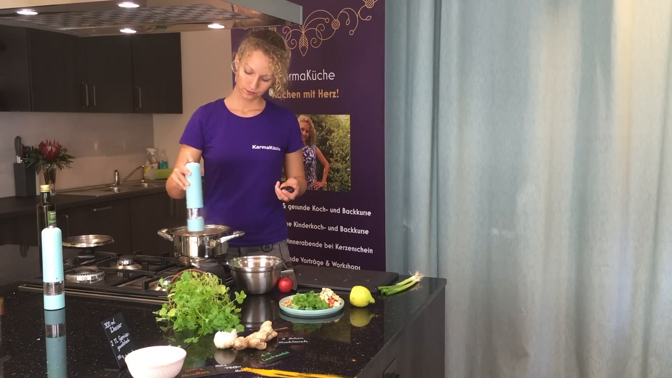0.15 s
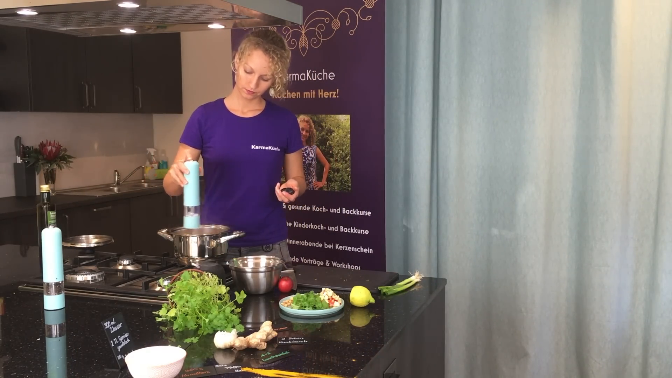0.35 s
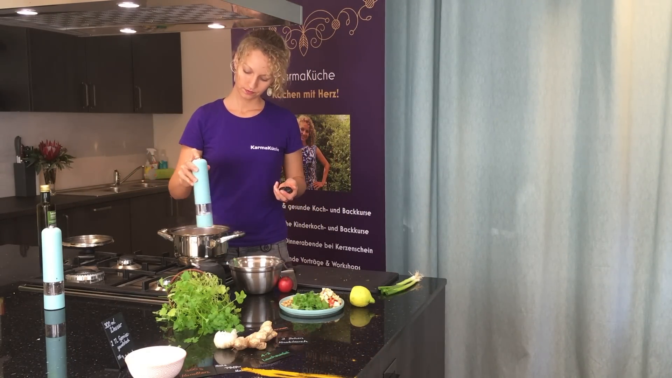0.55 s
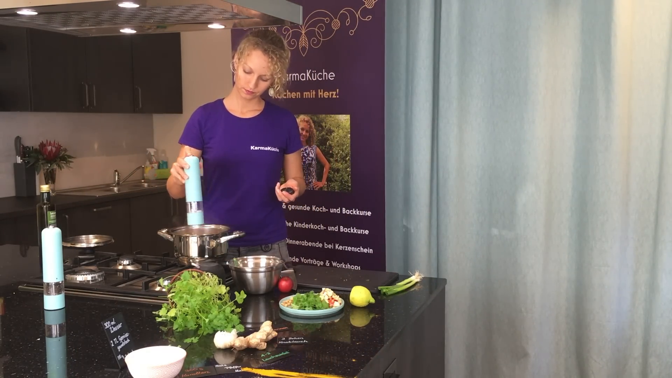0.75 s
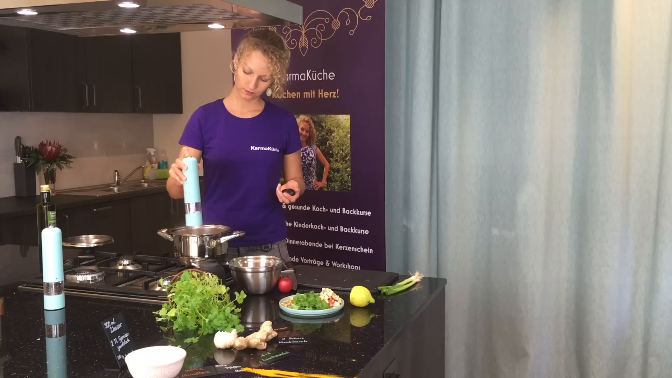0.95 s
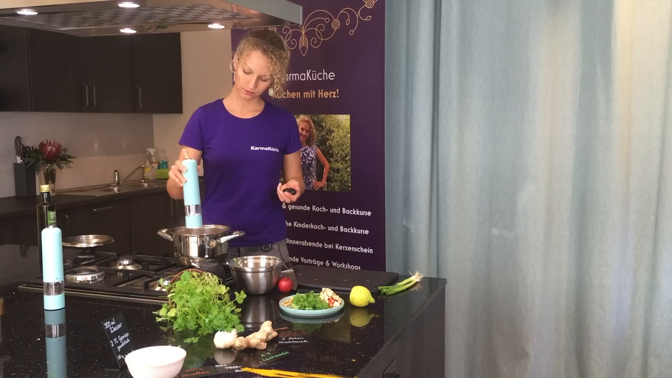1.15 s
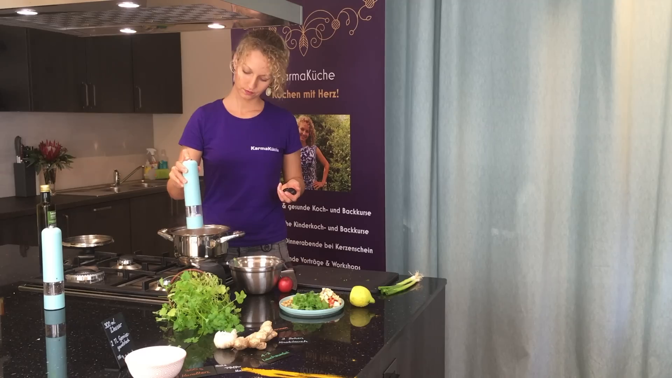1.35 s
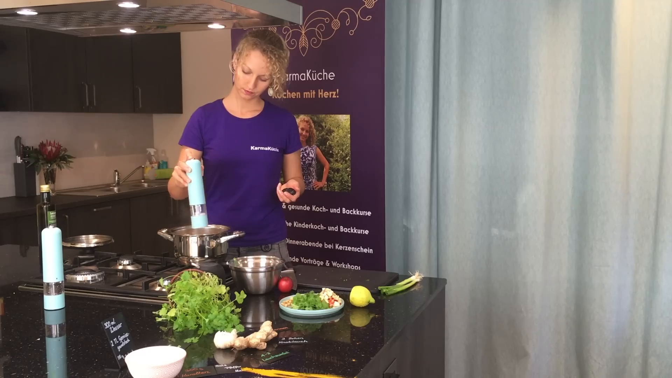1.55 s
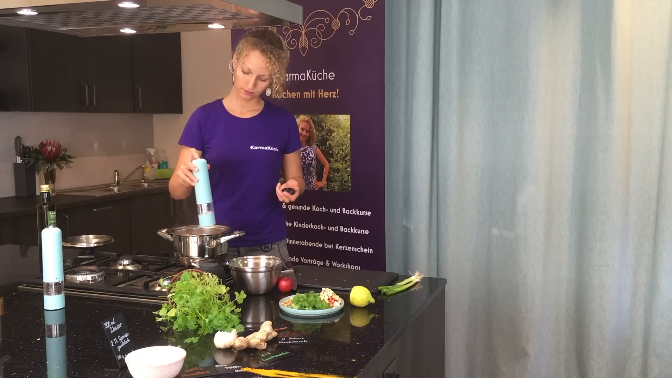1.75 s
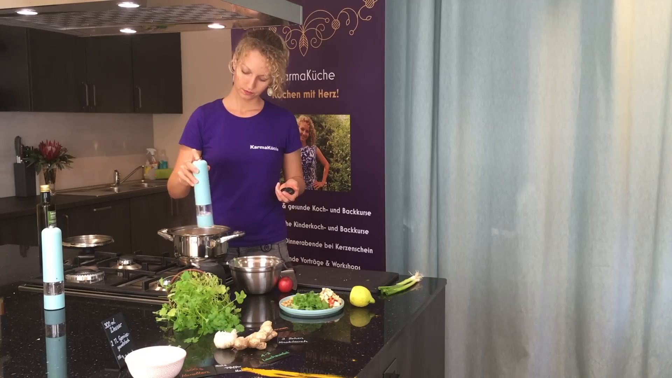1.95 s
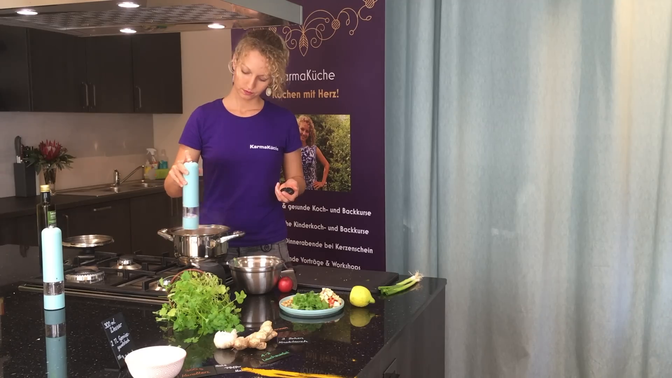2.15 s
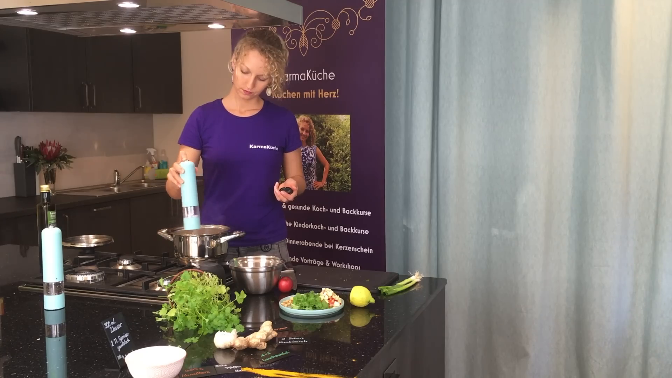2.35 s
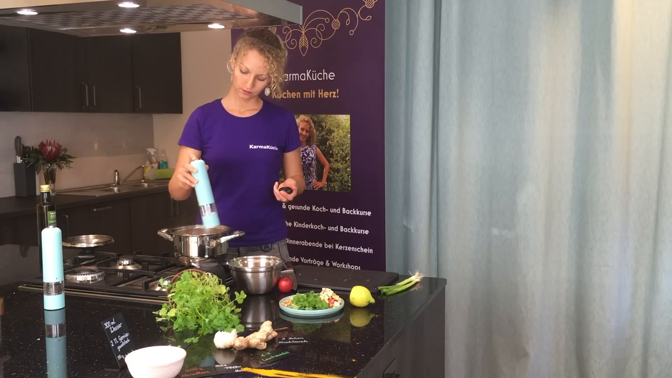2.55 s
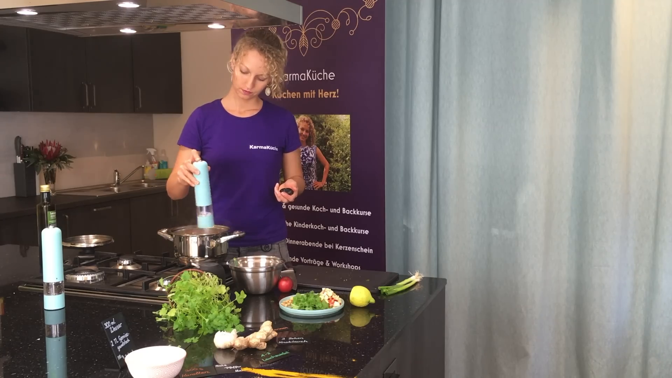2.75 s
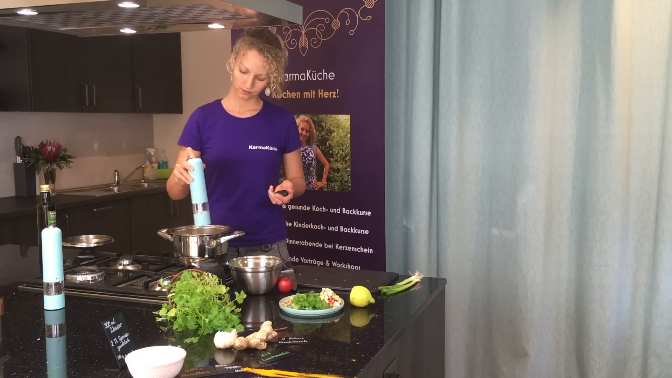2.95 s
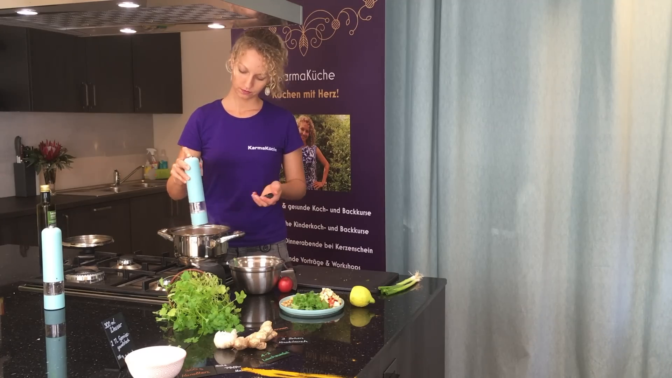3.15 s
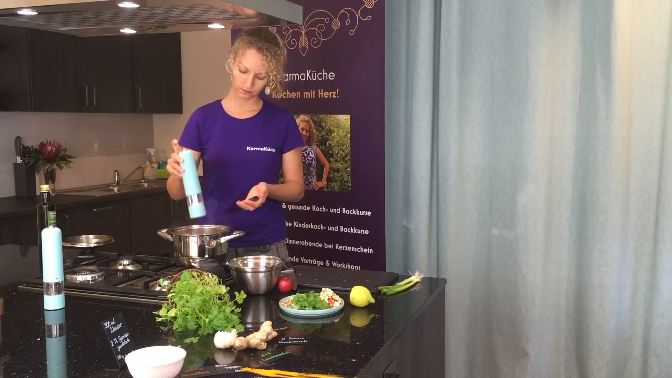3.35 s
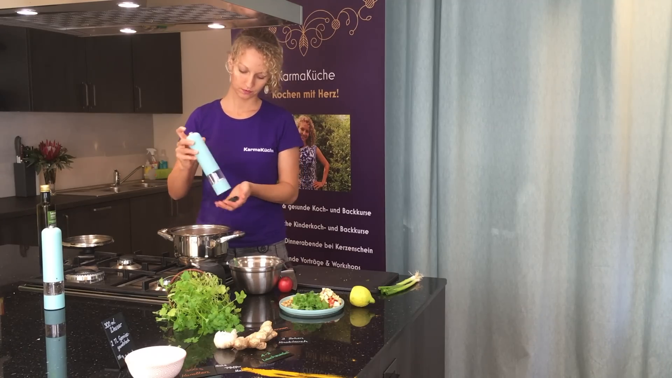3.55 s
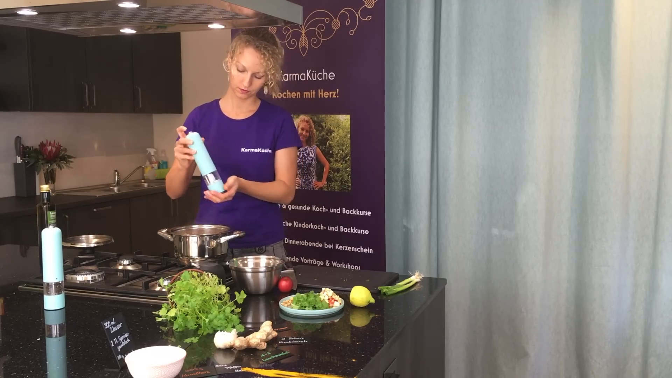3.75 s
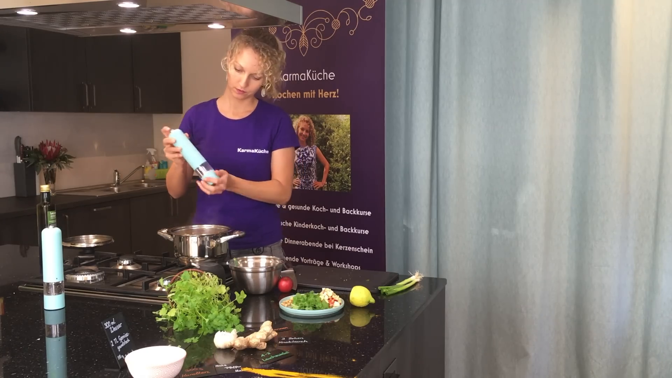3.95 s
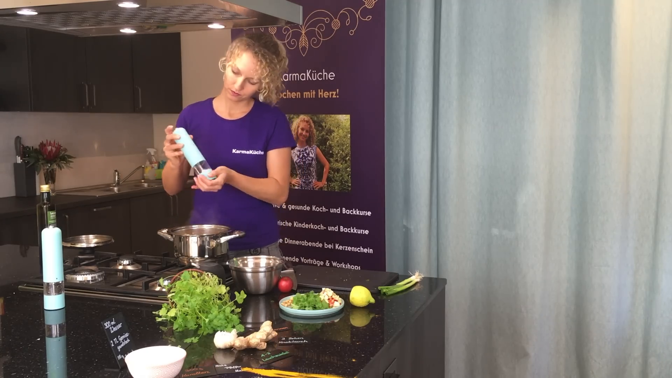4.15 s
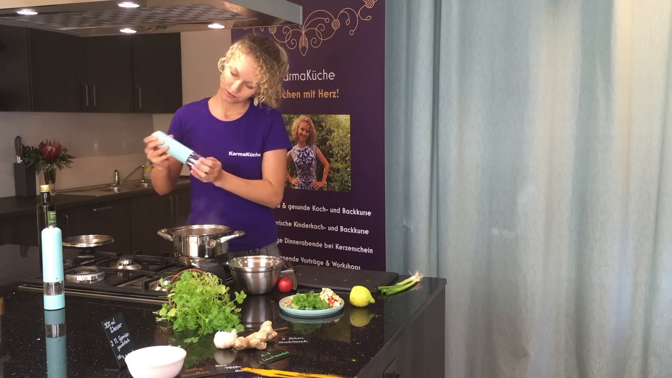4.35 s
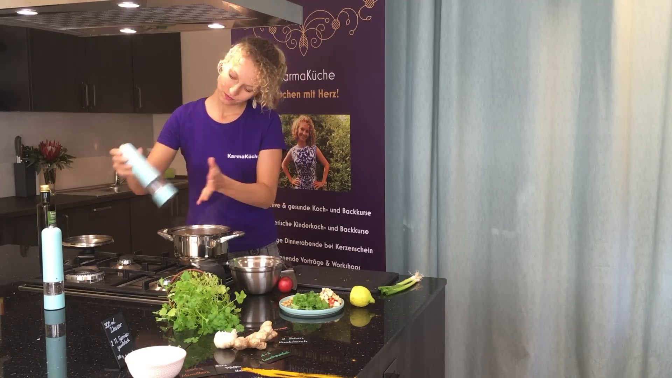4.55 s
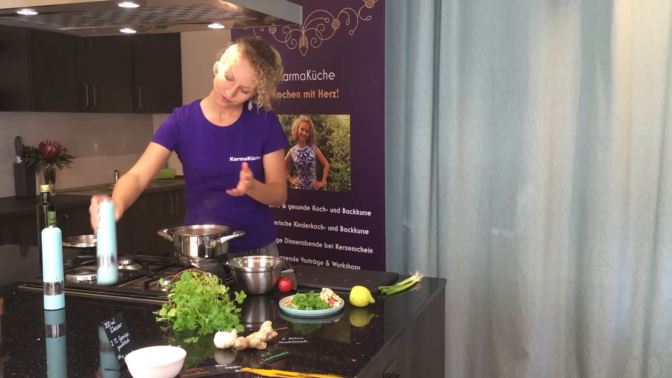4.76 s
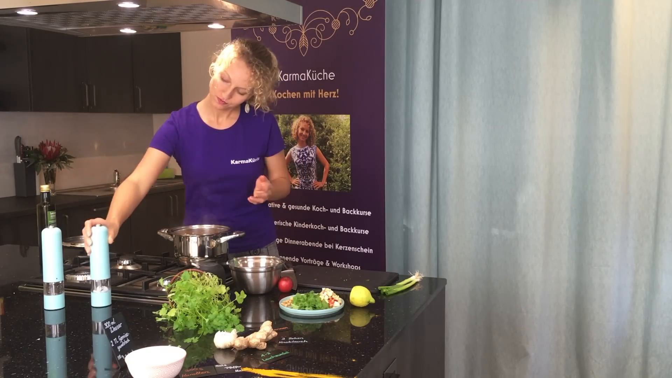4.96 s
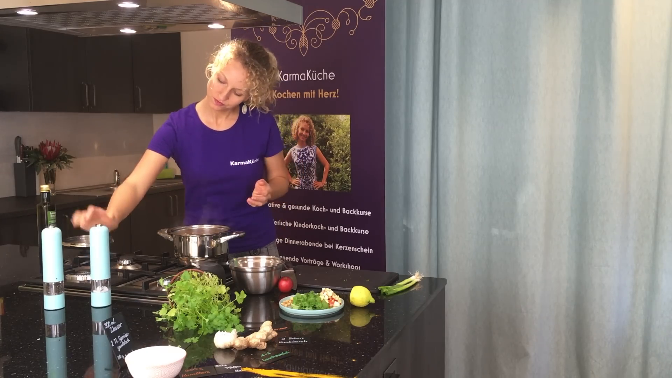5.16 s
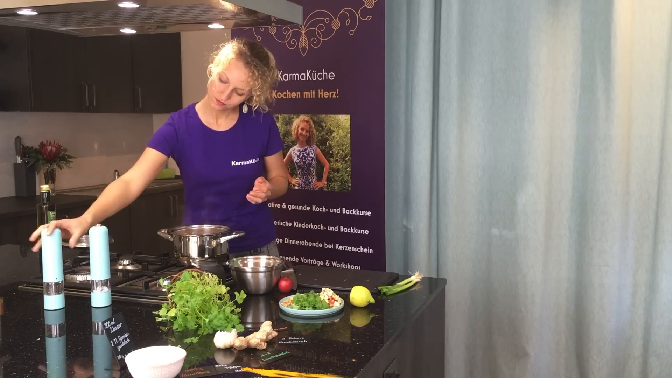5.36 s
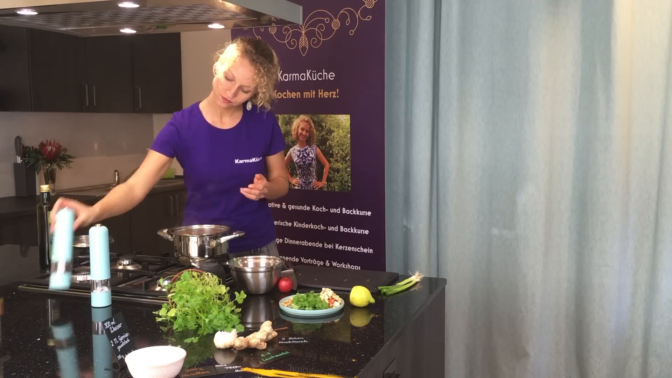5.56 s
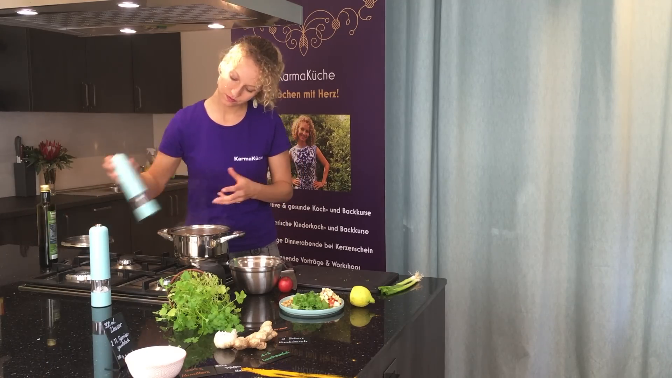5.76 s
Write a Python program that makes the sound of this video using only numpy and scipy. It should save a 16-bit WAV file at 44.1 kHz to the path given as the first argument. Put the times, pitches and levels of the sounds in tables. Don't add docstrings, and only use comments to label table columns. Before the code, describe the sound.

From the first instant a battery-powered seasoning mill runs over a pot: a nasal, buzzing motor and gear whine with rough, bright grinding noise. The pitch sags briefly as corns jam, and creeps slightly higher after about 2.4 s. Dry cracks pop out at roughly 0.2, 0.6, 1.0, 1.6, 2.5 and 2.8 s. At 3.2 s the motor lets go and winds down within a fraction of a second, with a small last crackle at 3.4 s. A sharp plastic cap snap comes at 3.7 s, a short scraping slide near 3.9 s, and a hollow seating clack at 4.1 s. Light ticks follow at 4.3 and 4.5 s. At 4.95 s the mill lands on stone with a low, solid thump; small double knocks come around 5.4 to 5.5 s. The hard-walled kitchen rings around everything, heard by a distant mono microphone over faint hiss and extractor hum.

```python
import sys
import numpy as np
from scipy import signal
from scipy.fft import rfft, irfft, next_fast_len
from scipy.io import wavfile

SR = 44100
rng = np.random.default_rng(int(sys.argv[2]) if len(sys.argv) > 2 else 0)


def waveform_to_disk(signal):
    frames = np.transpose(np.atleast_2d(signal))
    scaled = np.clip(frames, -1, 1) * 32767
    samples = np.round(scaled).astype(np.int16)
    wavfile.write(sys.argv[1], SR, samples)


def makeup_ratio(level_db):
    decades = np.asarray(level_db, float) / 20
    return 10 ** decades


N = 256220

# multiple of shaft speed, level in dB.
WHINE_ORDERS = [(1, -28), (3, -12.5), (4, -11.5), (5, -26), (6, -24), (7, -2.5), (8, -3), (9, -9),
                (10, -2.5), (11, 3), (12, -4.5), (14, -5), (15, -12), (16, -13), (18, -18), (21, -5),
                (22, -13.5), (33, -8.5)]
# time in seconds, shaft speed in turns per second.
FREE_SPEED = [(0, 194), (.12, 199), (.45, 194), (.66, 193), (.76, 200), (1.35, 196), (1.62, 196),
              (1.85, 199), (2.13, 203), (2.33, 204), (2.47, 213), (3.1, 212), (3.23, 208)]
# middle in seconds, length in seconds, speed sag in Hz.
JAMS = [(.36, .07, 7), (.99, .16, 14), (1.105, .08, 31), (1.2, .14, 14), (1.445, .11, 16), (1.725, .07, 35),
        (2.005, .19, 14), (2.68, .29, 10), (2.925, .16, 24)]
# middle in seconds, length in seconds, whine boost in dB.
BITES = [(.27, .25, 5), (.55, .25, 4), (.86, .22, 7), (1.1, .08, 2), (1.36, .14, 5), (1.57, .14, 3),
         (2.01, .17, 9), (2.3, .24, 8), (2.5, .08, 4), (2.93, .14, 5), (3.13, .15, 2)]
# frequency in Hz, level in dB per Hz.
GRIT_SPECTRUM = [(88, -51), (150, -56), (193, -28), (367, -31.5), (608, -12.5), (950, -10.5), (1370, -4),
                 (1910, -5), (2110, -5), (3850, -9), (6630, -11.5), (7750, -17), (9790, -12.5),
                 (15600, -15)]
# frequency in Hz, width in Hz, level in dB.
SHELL_MODES = [(1400, 180, -6), (1575, 71, 3), (2200, 160, 5.5), (2940, 690, 7.5), (4630, 500, 7),
               (6370, 1600, -1.5), (9300, 530, -5)]

# start in seconds, peak in dB,
# treble in dB per octave.
CRACKS = [(0.181, -22.5, -0.5), (.632, -17.5, -1), (1, -22, 1), (1.23, -47, -2), (1.63, -22, 5),
          (1.645, -21, -0.5), (1.658, -33, -2), (2.15, -33, 13), (2.5035, -18, 5), (2.5805, -16, 8.5),
          (2.811, -18.5, 1), (2.838, -23, 12), (2.98, -40, -5), (3.145, -45, 0), (3.25, -23.5, -4.5),
          (3.405, -30.5, 18.5)]
# start in seconds, peak in dB, treble in dB per octave.
SNAPS = [
    (3.6948, -25.5, -2),
    (3.7047, -9.5, 1.5),
]
# start in seconds, peak in dB, treble in dB per octave.
PUSHES = [
    (3.947, -46, 0.71),
    (4.0815, -16.5, 0),
]
# start in seconds, peak in dB, treble in dB per octave.
TICKS = [
    (4.2697, -37, 1.6),
    (4.5165, -31, -1.8),
]
# start in seconds, peak in dB, treble in dB per octave.
THUMPS = [
    (4.9515, -16, -0.5),
    (5.355, -54.5, -13),
    (5.41, -55, -6),
    (5.47, -52.5, -26),
    (5.54, -56.5, -5),
]
# start in seconds, peak in dB, treble in dB per octave.
LIFTS = [
    (5.3878, -30.5, 0.93),
    (5.3985, -45, 1),
    (5.456, -35, 3.6),
    (5.467, -41.5, 0.84),
]
# seated at, in seconds, rise in seconds, level in dB.
SLIDES = [
    (3.946, 0.032, -38),
    (4.08, 0.0049, -41),
]

# frequency in Hz, width in Hz, level in dB.
CORN_MODES = [(506, 300, -29.5), (1330, 1100, 8.5), (3010, 500, 16.5), (5760, 2700, 1), (11900, 2700, -24)]
# frequency in Hz, width in Hz, level in dB.
CAP_MODES = [(336, 170, -16), (950, 540, -14), (1760, 610, -2), (2600, 720, -3.5), (3130, 370, 5),
             (4200, 790, -1.5), (6100, 340, 1.5), (8450, 460, -7), (10100, 310, -2.5), (13650, 900, -7),
             (6900, 60000, -12)]
# frequency in Hz, width in Hz, level in dB.
TUBE_MODES = [(285, 440, -23), (540, 120, -17), (1033, 95, 1.5), (1212, 280, 0.5), (1840, 830, -8),
              (3270, 880, -7.5), (4350, 570, -9.5), (5970, 1000, -15.5), (8000, 330, -49),
              (11000, 8800, -26)]
# frequency in Hz, width in Hz, level in dB.
RIM_MODES = [(4340, 720, 3), (9500, 1600, -6), (10900, 830, -6), (11800, 31000, -9)]
# frequency in Hz, width in Hz, level in dB.
COUNTER_MODES = [(70.4, 8.5, 8.5), (86.4, 5.9, -7), (127, 52, -6.5), (172, 33, -0.5), (225, 28, -6),
                 (264, 53, 4.5), (312, 60, -5.5), (423, 53, -3.5), (714, 100, -11.5), (870, 240, -15.5),
                 (1210, 294, -3), (3100, 1900, -18), (6030, 1040, -21), (11200, 5700, -29.5)]
# frequency in Hz, width in Hz, level in dB.
BASE_MODES = [(288, 750, 4.5), (1330, 260, 9.5), (2700, 2400, -1), (6400, 1800, -1), (11800, 8800, -3.5)]

# frequency in Hz, T60 in seconds.
ROOM_T60_S = [(80, 0.71), (210, 0.75), (560, 0.49), (1470, 0.78), (3880, 0.77), (10200, 0.5), (16000, 0.25)]
# frequency in Hz, level in dB.
ROOM_LEVEL_DB = [(80, 13.5), (250, 12.5), (600, 13.5), (1500, 5.5), (4000, 1), (10000, 3.5), (16000, -2)]
# delay in seconds, level in dB.
EARLY_ECHOES = [(.0034, -2.5), (.009, -25), (.0135, -13.5), (.021, -5.5), (.029, -9.5)]
# frequency in Hz, level in dB per Hz.
AIR_SPECTRUM = [(76, -33), (130, -7.5), (242, -9), (308, -10.5), (488, -11.5), (659, -15), (2280, -24),
                (7740, -27.5), (8900, -26.5), (10200, -25), (12300, -24), (15600, -24)]
# frequency in Hz, level in dB rms.
HUM_TONES = [(48.4, -66), (96.9, -62.5), (199.2, -79.5), (306.8, -72.5)]
# frequency in Hz, width in Hz, level in dB.
MIC_COLOUR = [(4580, 83, -4), (7580, 300, 1), (8550, 110, 2.5), (10530, 190, -4.5)]
# time in seconds, side against treble in dB.
PARTINGS = [(.815, -26), (1.895, -34), (2.01, -36), (2.105, -31), (2.18, -37), (2.347, -6), (2.555, -35),
            (4.66, -12), (4.73, -9), (4.9, -17), (5.34, -17)]

STOP_S, COAST_S, BRAKE_HZ_PER_S = 3.213, 0.073, 600
TEETH, OTHER_ORDERS_SHARE = 11, 0.34
WHINE_DB, WHINE_ROOM_SHARE = -41.5, 0.4
FLUTTER_DB, FLUTTER_PER_S = 2.0, 35
GRIND_DB, BRIGHT_DB, BRIGHTEN_DB_PER_S = -36.5, -3.5, 0.55
CRUSH_DB, CRUSH_S, LOUD_CRACK_DB = 6.5, 0.043, -11.5
JAM_DB_PER_HZ = -0.0289
SLIDE_RISE_DB, SLIDE_FADE_DB_PER_S = 12, 354
AIR_DB, RUMBLE_DB = -61, -67
EDGE_HZ = 15860


def mill():
    t_s = np.arange(N) / SR
    sag_hz = plateaus(JAMS)
    after_s = np.maximum(t_s - STOP_S, 0)
    free_hz = np.interp(t_s, *np.transpose(FREE_SPEED))
    shaft_hz = np.maximum(free_hz - sag_hz - BRAKE_HZ_PER_S * after_s, 20)
    turns = np.cumsum(shaft_hz * (1 + 0.004 * wander(30))) / SR
    effort_db = GRIND_DB + CRUSH_DB * crush_load() + JAM_DB_PER_HZ * sag_hz
    coast = np.exp(-after_s / COAST_S)
    return coast * grit(turns, effort_db), coast * makeup_ratio(WHINE_DB) * evened(whine(turns))


def crush_load():
    load = np.zeros(N)
    for start_s, peak_db, _ in CRACKS:
        load[round(start_s * SR)] = makeup_ratio(peak_db - LOUD_CRACK_DB)
    return signal.lfilter([1], [1, -np.exp(-1 / (CRUSH_S * SR))], load)


def whine(turns):
    bite_db = plateaus(BITES)
    out = np.zeros(N)
    for order, db in WHINE_ORDERS:
        share = OTHER_ORDERS_SHARE if order % TEETH else 1
        level_db = db + FLUTTER_DB * wander(FLUTTER_PER_S) + bite_db * share
        out += makeup_ratio(level_db) * np.cos(2 * np.pi * (order * turns + rng.random()))
    return out


def grit(turns, effort_db):
    gate = 0.55 + 0.5 * np.exp(-(3 * turns % 1) / 0.18) + 0.33 * np.exp(-(turns % 1) / 0.25)
    puffs = evened(gate * rng.standard_normal(N))
    crumb_size = makeup_ratio(4.0 * np.minimum(rng.exponential(1, N), 3))
    crumbs = crumb_size * (rng.random(N) < 1500 / SR) * rng.choice([-1, 1], N)
    raw = puffs + 0.6 * evened(crumbs * makeup_ratio(2.5 * wander(25)))
    raw = coloured(raw, lambda hz: makeup_ratio(read(GRIT_SPECTRUM, hz)))
    high = coloured(raw, lambda hz: 1 / (1 + (4500 / (hz + 1)) ** 4))
    ringing = np.zeros(N)
    for mode_hz, width_hz, db in SHELL_MODES:
        ringing += makeup_ratio(db + 1.5 * wander(5)) * resonate(raw, mode_hz, width_hz)
    bright_db = BRIGHT_DB + BRIGHTEN_DB_PER_S * np.arange(N) / SR
    body = evened(raw - high + 1.25 * ringing) + makeup_ratio(bright_db) * evened(high)
    return makeup_ratio(effort_db - 6 + 1.0 * wander(45)) * body


def hits(rows, modes, chatter_s):
    out = np.zeros(N + 9000)
    t_s = np.arange(800) / SR
    for start_s, peak_db, treble_db in rows:
        force = np.fft.fft(rng.standard_normal(800) * np.exp(-t_s / chatter_s), 4096)
        force = np.fft.ifft(force / causal(np.log(abs(force) + 1e-9))).real[:800]
        ring = signal.fftconvolve(force, response(modes, treble_db))
        out[round(start_s * SR):][:len(ring)] += makeup_ratio(peak_db) * ring / abs(ring).max()
    return out[:N]


def rub():
    t_s = np.arange(N) / SR
    effort = np.zeros(N)
    for seated_s, rise_s, db in SLIDES:
        rise_db = SLIDE_RISE_DB * (seated_s - t_s) / rise_s
        fade_db = SLIDE_FADE_DB_PER_S * (t_s - seated_s)
        effort += (t_s > seated_s - rise_s) * makeup_ratio(db - np.where(t_s < seated_s, rise_db, fade_db))
    slips = evened(rng.standard_normal(N) * (rng.random(N) < 4000 / SR))
    tube, rim = response(TUBE_MODES), response(RIM_MODES)
    both = tube / np.linalg.norm(tube) + makeup_ratio(-14) * rim / np.linalg.norm(rim)
    return signal.oaconvolve(effort * slips, both)[:N]


def kitchen(x):
    longer = np.r_[x[SR:0:-1], x]
    turn = np.pi * np.arange(len(longer)) / SR / 0.5
    out = x.copy()
    for k in range(3):
        share = np.sqrt(2 / 3) * abs(np.cos(turn + k * np.pi / 3))
        out += signal.fftconvolve(share * longer, room_tail())[SR:SR + N]
    return out


def room_tail():
    taps = np.zeros(SR)
    at = np.arange(100, SR - 12, 12)
    taps[at + rng.integers(0, 12, len(at))] = rng.choice([-1., 1.], len(at))
    hz, t_s, z = signal.stft(taps, SR, nperseg=512)
    t60_s = read(ROOM_T60_S, hz)[:, None]
    build = 1 - np.exp(-t_s / 0.0014)
    decay = makeup_ratio(read(ROOM_LEVEL_DB, hz)[:, None] - 60 * t_s / t60_s) / np.sqrt(t60_s)
    tail = signal.istft(z * build * decay, SR, nperseg=512)[1]
    tail *= np.sqrt(12 * 2 * np.log(1000) / SR) * (np.arange(len(tail)) > 100)
    for delay_s, db in EARLY_ECHOES:
        tail[round(delay_s * SR * rng.uniform(0.97, 1.03))] += makeup_ratio(db - 3.5)
    return tail


def background():
    t_s = np.arange(N) / SR
    air = coloured(rng.standard_normal(N), lambda hz: makeup_ratio(read(AIR_SPECTRUM, hz)) * (hz > 20))
    rumble = resonate(resonate(rng.standard_normal(N), 49, 50), 49, 50)
    out = makeup_ratio(AIR_DB) * evened(air) + makeup_ratio(RUMBLE_DB) * evened(rumble)
    for tone_hz, db in HUM_TONES:
        level = np.sqrt(2) * makeup_ratio(db + 1.0 * wander(3))
        out += level * np.cos(2 * np.pi * (tone_hz * t_s + 0.039 * wander(1.6)))
    return out


def response(modes, treble_db=0):
    hz = abs(np.fft.fftfreq(16384, 1 / SR)) + 1
    power = np.zeros(len(hz))
    for mode_hz, width_hz, db in modes:
        detune = (hz - mode_hz * mode_hz / hz) / width_hz
        power += makeup_ratio(2 * db) / (1 + detune ** 2) ** 1.63
    tilt = np.log(makeup_ratio(treble_db * np.log2(np.maximum(hz, 250) / 2000)))
    return np.fft.ifft(causal(0.5 * np.log(power + 1e-10) + tilt)).real[:8192]


def causal(log_gain):
    return np.exp(np.conj(signal.hilbert(log_gain)))


def resonate(x, hz, width_hz):
    turn = np.exp(2j * np.pi * np.cumsum(hz * np.ones(len(x))) / SR)
    r = np.exp(-np.pi * width_hz / SR)
    return 2 * (turn * signal.lfilter([1 - r], [1, -r], x / turn)).real


def coloured(x, gain):
    size = next_fast_len(len(x))
    return irfft(rfft(x, size) * gain(np.fft.rfftfreq(size, 1 / SR)), size)[:len(x)]


def read(points, hz):
    f, value = np.transpose(points)
    return np.interp(np.log(hz + 1), np.log(f + 1), value)


def wander(rate_hz):
    hz = np.fft.rfftfreq(2048, 128 / SR)
    slow = evened(irfft(rfft(rng.standard_normal(2048)) * np.exp(-(hz / rate_hz) ** 2)))
    return np.interp(np.arange(N) / 128, np.arange(2048), slow)


def plateaus(rows):
    t_s = np.arange(0, N + 64, 64) / SR
    slow = sum(height * np.exp(-(2 * (t_s - mid_s) / length_s) ** 4) for mid_s, length_s, height in rows)
    return np.interp(np.arange(N) / SR, t_s, slow)


def evened(x):
    return x / np.sqrt(np.mean(x ** 2) + 1e-20)


def scene():
    grinding, whining = mill()
    dry = grinding + rub()
    dry += hits(CRACKS, CORN_MODES, chatter_s=0.0014)
    dry += hits(SNAPS, CAP_MODES, chatter_s=0.0047)
    dry += hits(PUSHES, TUBE_MODES, chatter_s=0.0041)
    dry += hits(TICKS, RIM_MODES, chatter_s=0.00094)
    dry += hits(THUMPS, COUNTER_MODES, chatter_s=0.00133)
    dry += hits(LIFTS, BASE_MODES, chatter_s=0.0023)
    heard = kitchen(dry + WHINE_ROOM_SHARE * whining) + (1 - WHINE_ROOM_SHARE) * whining
    return np.tile(heard + background(), (2, 1))


def band_limit(x):
    return signal.sosfilt(signal.butter(12, 16690, fs=SR, output="sos"), x)


def record(dry):
    def microphone(hz):
        colour_db = sum(db / (1 + ((hz - band_hz) / width_hz) ** 2) for band_hz, width_hz, db in MIC_COLOUR)
        return makeup_ratio(colour_db) * makeup_ratio(-60 * (hz > EDGE_HZ)) / (1 + (42 / (hz + 1)) ** 4)

    mid = coloured(dry.mean(axis=0), microphone)
    t_s = np.arange(N) / SR
    opening = np.zeros(N)
    for at_s, db in PARTINGS:
        opening += makeup_ratio(db) * np.cos(np.pi / 2 * np.clip((t_s - at_s) / 0.02, -1, 1))
    treble = coloured(mid, lambda hz: hz > 4200)
    side = opening * np.roll(treble, 700)
    return band_limit(np.array([mid + side, mid - side]))


dry = scene()
out = record(dry)
waveform_to_disk(out)
```